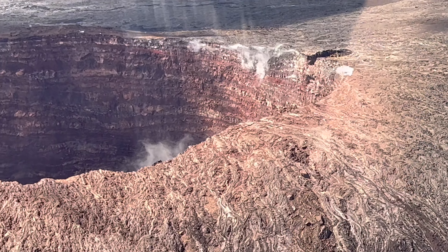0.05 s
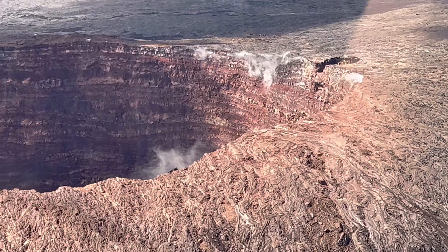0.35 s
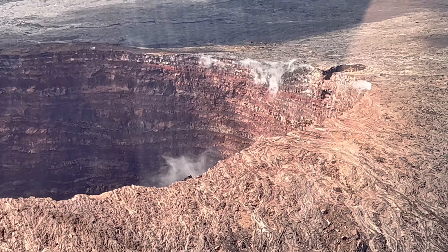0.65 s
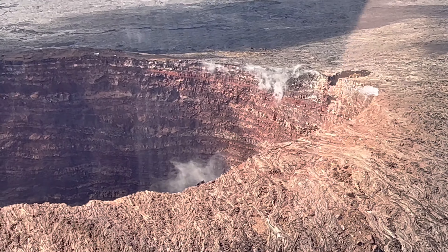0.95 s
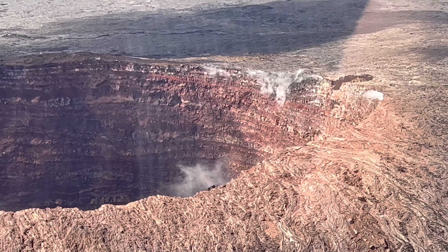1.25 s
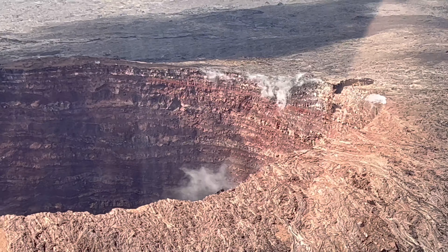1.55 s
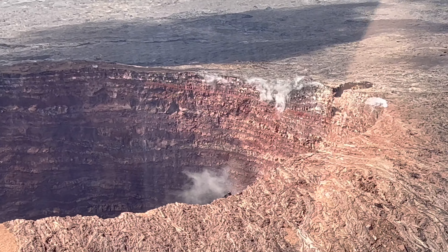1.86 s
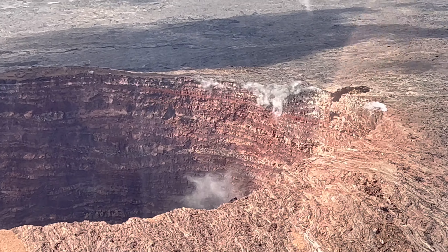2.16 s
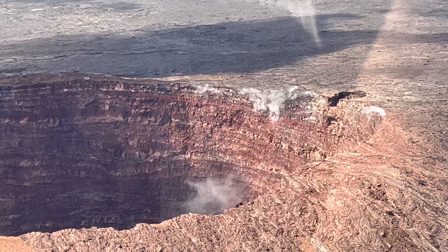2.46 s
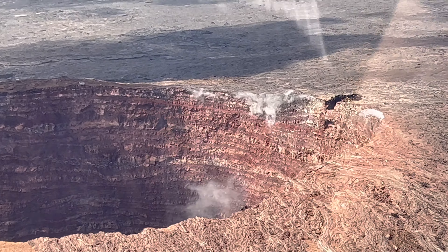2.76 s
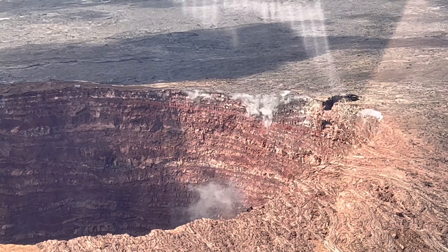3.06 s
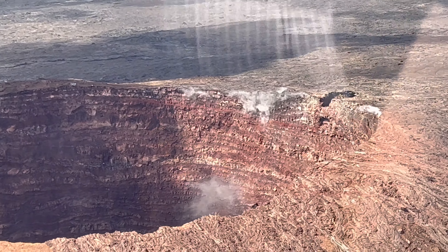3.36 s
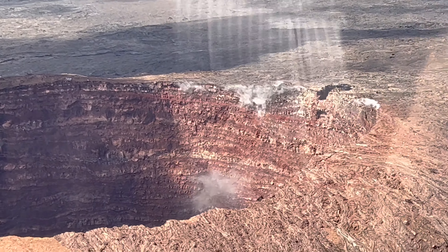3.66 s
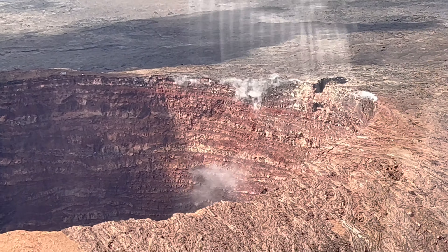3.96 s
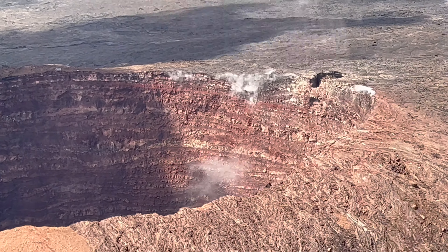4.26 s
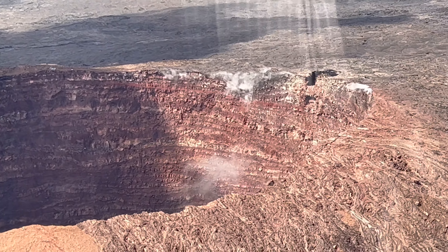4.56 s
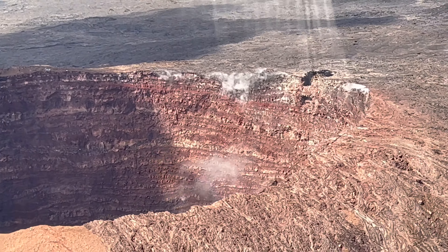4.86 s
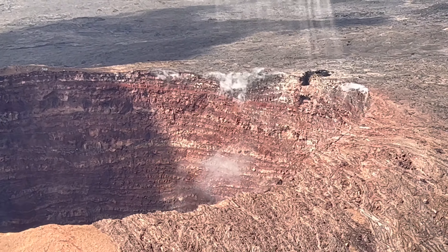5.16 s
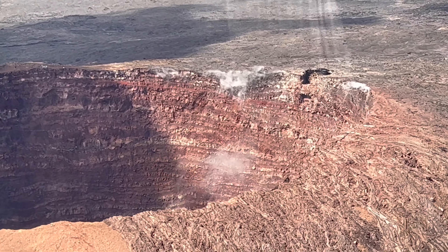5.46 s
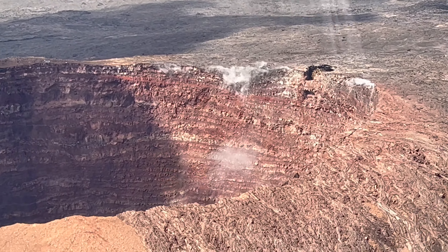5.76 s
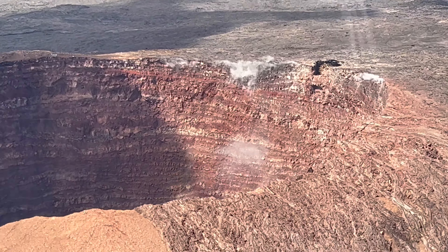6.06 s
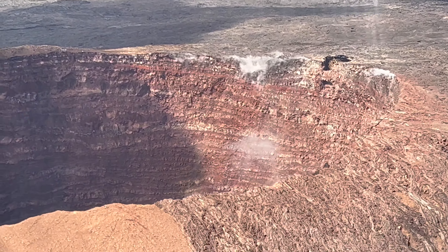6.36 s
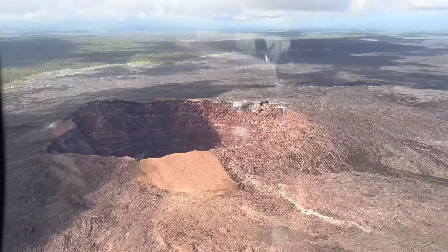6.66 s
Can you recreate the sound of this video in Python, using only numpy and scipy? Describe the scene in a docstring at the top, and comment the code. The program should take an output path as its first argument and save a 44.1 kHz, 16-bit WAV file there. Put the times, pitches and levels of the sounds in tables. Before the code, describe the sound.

A helicopter in level flight is heard from a seat inside the cabin. The rotor makes a fast, low thudding over a steady engine drone and rumbling wind. A constant high gear whine and faint wavering fan whistles sit on top, along with a hiss of air. Near the end the sound suddenly becomes wider and brighter, with more hiss and a stronger whine.

```python
"""Three main rotor blades thump and slap the cabin of a turbine helicopter in level flight.
Their periodic loading drives harmonics of the blade rate, and their wash buffets the fuselage.
Meshing gears whine, the tail rotor hums and a cooling fan sings over the turbulent rush of air.
The microphones listen in a narrow beam; near the end it opens and the cabin turns wide and bright."""
import sys
import numpy as np
from scipy import signal
from scipy.fft import rfft, irfft
from scipy.io import wavfile

SR = 44100
rng = np.random.default_rng(int(sys.argv[2]) if len(sys.argv) > 2 else 0)


def master(y):
    """Save y as 16-bit WAV."""
    cut = np.clip(np.atleast_2d(y).T, -1, 1)
    pcm = np.round(cut * 32767)  # scale
    wavfile.write(sys.argv[1], SR, pcm.astype(np.int16))


N = 304731
TIME = np.arange(N) / SR
FREQS = np.maximum(np.fft.rfftfreq(N, 1 / SR), 1)
BLADES, BLADE_HZ = 3, 19.44
BLADE_PASSES = BLADE_HZ * TIME
EARS = np.array([[-.5], [.5]])   # splits a right-minus-left difference between the ears
CROSSOVER_HZ = 600   # rumble below, hiss above


# Strongest cabin boom, on the third harmonic of the blade rate: (time [s], level [dB])
MAIN_BOOM = [(0.0, -15.5), (0.6, -22.5), (1.0, -18.5), (1.8, -27), (2.5, -22), (2.9, -20.5), (4.0, -17),
             (5.6, -18.5), (6.5, -16), (6.9, -21)]
# Booms on either side of it: (time [s], second harmonic [dB], fourth harmonic [dB])
SIDE_BOOMS = [(0.0, -48, -26), (1.3, -49, -19.5), (2.0, -36, -26.5), (2.6, -34, -25), (3.4, -36, -20.5),
              (4.1, -38, -28), (5.6, -33, -25), (6.9, -28, -35)]
# Steady hums that beat with the booms: (harmonic number, offset [Hz], time of a swell [s])
BEATING_HUMS = [(3, 1.587, .2), (4, -.948, .35)]
# Weaker harmonics: (harmonic number, relative level [dB], interaural phase [rad])
WEAK_HARMONICS = [(1, -36, 0.5), (5, -40, -0.49), (6, -38, -0.59), (7, -35, 0.55), (8, -32.5, -1),
                  (9, -35.5, -0.48), (10, -37.5, 1.1), (15, -37.5, 2.2)]

def rotor_thump(weak_db, waver):
    """Periodic forcing: each blade drops the pressure on the roof; the cabin booms on the harmonics."""
    crest, phase_spread_rad, hum_db = .76, 3.44, -32.5
    main_db, = in_time(MAIN_BOOM)
    out = from_db(main_db) * blade_wave(crest, 3, EARS * .14)
    for order, boom_db in zip((2, 4), in_time(SIDE_BOOMS)):
        out += from_db(boom_db) * blade_wave(crest, order, EARS * .092)
    for order, offset_hz, swell_s in BEATING_HUMS:
        beat_phase = 2 * np.pi * offset_hz * (TIME - swell_s)
        out += from_db(hum_db) * blade_wave(crest, order, beat_phase + EARS * .14)
    for order, level_db, ear_phase in WEAK_HARMONICS:
        standing_wave_shift = phase_spread_rad * (rng.random() - .5)
        wave = blade_wave(crest, order, EARS * ear_phase + standing_wave_shift)
        out += from_db(level_db + weak_db) * (1 + waver * drift(.86)) * wave
    return np.sqrt(2) * out * from_db(.6 * EARS)


# Blade loading, heard as the strength of the slap: (time [s], relative level [dB])
BLADE_LOAD = [(0.0, -19), (0.6, -32.5), (1.2, -21.5), (1.7, -39), (2.5, -39), (3.3, -29), (4.1, -20.5),
              (4.6, -23.5), (5.1, -20.5), (5.8, -23), (6.4, -25), (6.9, -34)]
# Canopy modes: (frequency [Hz], bandwidth [Hz], relative gain [dB])
CANOPY_MODES = [(214.8, 26, 5), (256, 37, 3.5)]

def blade_slap(level_db, scatter_db, jitter_s):
    """Impulse excitation: each blade cuts the wake of the last and rings the canopy, harder under load."""
    load_db, = in_time(BLADE_LOAD)
    passes = np.arange(int(BLADE_PASSES[-1]) + 1)
    timing, force = rng.standard_normal((len(passes), 2)).T
    knock_s = (passes + .03) / BLADE_HZ + jitter_s * timing
    knocks = np.zeros(N)
    knocks[np.clip(knock_s * SR, 0, N - 1).astype(int)] = from_db(scatter_db * force)
    ring = sum((-1) ** k * from_db(db) * resonate(knocks, hz, width)
               for k, (hz, width, db) in enumerate(CANOPY_MODES))
    soft_ring = rms_one(resonate(ring, hz=230, width_hz=330))
    return soft_ring * from_db(level_db + load_db) * from_db(1.4 * EARS)


# Air noise along the fuselage: (frequency [Hz], spectral density [dB re 1/Hz])
RUMBLE_SPECTRUM = [(15, -75), (30, -66), (39, -49), (50, -51), (65, -39.5), (95, -38.5), (140, -43.5),
                   (200, -45), (270, -48.5), (340, -55.5), (450, -55.5), (600, -56)]
# Strength of the rotor wash: (time [s], gain [dB])
WASH_GAIN = [(0.0, -1), (0.8, -1), (1.8, -2.2), (2.4, -3), (3.3, -3), (3.9, 0.5), (4.7, 1.5), (5.5, 0.5),
             (6.2, 1.5), (6.9, 1.5)]

def rotor_wash(opening, buffet_db, gust_db, chop, puff_depth, open_db):
    """Turbulent excitation: wash buffets the fuselage, and each slap puffs against the drumming panels."""
    wash_db, = in_time(WASH_GAIN)
    low = air_noise(RUMBLE_SPECTRUM, NARROW_CORRELATION, below(210))
    middle = air_noise(RUMBLE_SPECTRUM, NARROW_CORRELATION, between(169, 327))
    high = air_noise(RUMBLE_SPECTRUM, NARROW_CORRELATION, between(294, CROSSOVER_HZ))
    chopped = middle * from_db(-.35 + .49 * wash_db) * (1 + chop * blade_wave(crest=.1))
    buffeting = (low * from_db(wash_db) + chopped) * from_db(buffet_db + gust_db * drift(1.4))
    load_db, = in_time(BLADE_LOAD)
    excess_db = load_db - load_db.mean()
    puffs = 1 + puff_depth * from_db(.5 * excess_db) * blade_puff(rise_s=.001, decay_s=.0066)
    drumming = high * puffs * from_db(-.5 + .099 * excess_db + open_db * opening)
    return buffeting + drumming


def blade_puff(rise_s, decay_s):
    """Exponential decay: an envelope jumps at each slap and dies away before the next."""
    since_s = ((BLADE_PASSES - .02) % 1) / BLADE_HZ
    return (1 - np.exp(-since_s / rise_s)) * np.exp(-since_s / decay_s)


# Hollow cabin resonance, strongest towards the end: (time [s], level [dB])
CABIN_MODE_LEVEL = [(0.0, -53), (4.2, -41), (5.0, -27), (5.6, -34), (6.1, -30), (6.35, -37), (6.6, -46)]

def cabin_mode(hz, width_hz):
    """Resonance: random buffeting rings one low standing wave of the cabin."""
    level_db, = in_time(CABIN_MODE_LEVEL)
    ring = resonate(rng.standard_normal(N), hz, width_hz)
    return from_db(level_db) * rms_one(resonate(ring, hz, width_hz))


# Main gear mesh, which gives the speed of the shafts: (time [s], frequency [Hz])
GEAR_MESH = [(0.0, 1715.4), (0.7, 1713.5), (1.5, 1715.2), (2.1, 1710.2), (3.3, 1711.5), (4.1, 1714.0),
             (5.9, 1713.4), (6.9, 1712.0)]
# Gear whine with the beam narrow: (time [s], level [dB])
GEAR_LEVEL = [(0.0, -36), (0.3, -35.5), (1.2, -37.5), (2.6, -37.5), (3.0, -35), (4.5, -35), (5.5, -36),
              (6.1, -40.5)]
# Torque ripple on the gears: (cycles per rotor turn, relative amplitude)
TORQUE_RIPPLE = [(1, 0.04), (2, 0.03), (3, 0.12), (6, 0.055), (9, 0), (12, 0.04)]

def gear_whine(opening, open_db, ripple_db, rough_db, wobble_rad, ear_phase):
    """Modulation: the mesh tone throbs in amplitude with each blade and wobbles in phase once a turn."""
    mesh_hz, = in_time(GEAR_MESH)
    level_db, = in_time(GEAR_LEVEL)
    shaft_angle = 2 * np.pi * (BLADE_PASSES + .38) / BLADES
    ripple = sum(depth * np.cos(cycles * shaft_angle) for cycles, depth in TORQUE_RIPPLE)
    rough = from_db(rough_db) * (drift(60) + 1j * drift(45))
    # The throb keeps its strength, so a weak tone flutters more.
    amplitude = from_db(level_db + open_db * opening) + from_db(ripple_db) * ripple + rough
    phase = 2 * np.pi * np.cumsum(mesh_hz) / SR + wobble_rad * np.sin(shaft_angle)
    balance = from_db(EARS * (.2 - 2.4 * opening))
    return at_ears(amplitude * np.exp(1j * phase), ear_phase) * balance


# Tail rotor, shafts and turbine, and two thin tones near 8.5 kHz: (frequency [Hz], relative level [dB],
# unsteadiness [ratio], interaural phase [rad])
MACHINE_TONES = [(27.6, -49, .1, 0), (66.1, -34.5, .15, .1), (84.3, -38, .2, .1), (100.5, -37.5, .3, .7),
                 (119.8, -30.5, .1, .1), (369, -48, .5, .5), (486.5, -53, .5, 1.0), (642, -53, .3, -1.5),
                 (740, -54, .8, -.5), (1240, -61, .8, -.8), (1303.4, -57, .5, 1.9),
                 (1747.5, -56.5, .3, .35), (2890, -65, 1.5, 0), (3205, -66, .5, 0), (3435, -68, 1.0, 0),
                 (4535, -73, .6, 0), (4680, -68, 1.5, 0), (4805, -69, .5, 0), (6480, -72, .8, 0),
                 (8545, -66, 1.5, 1.2), (8586, -66.5, .8, 1.2)]

def machinery(opening, level_db, open_db, waver_rate):
    """Line spectrum: tail rotor, shafts and turbine hum steadily, and thin tones sit near 8.5 kHz; the open
    beam lifts the high tones."""
    out = np.zeros((2, N))
    for hz, tone_db, unsteady, ear_phase in MACHINE_TONES:
        lift_db = open_db * opening * (hz > CROSSOVER_HZ)
        out += from_db(level_db + tone_db + lift_db) * shaft_tone(hz, unsteady, ear_phase, waver_rate)
    return out


FAN_BLADE_HZ = 648.2
# Level of the fan's fundamental: (time [s], gain [dB])
FAN_SWELL = [(0.0, 5), (1.5, 2), (2.1, 6), (3.7, 4), (4.6, -1), (6.9, 1)]
# Fan partials: (harmonic number, relative level [dB], unsteadiness [ratio], interaural phase [rad])
FAN_PARTIALS = [(1, -49, 0, -0.95), (2, -46, 0, 2.4), (3, -61.5, 0.6, 1)]

def cooling_fan(opening, fading_db, waver_rate, beat_depth, beat_hz, crest_s, open_db):
    """Blade-passing tone: the oil cooler's fan beats slowly; overtones fade as standing waves shift."""
    hum_db, = in_time(FAN_SWELL)
    hum = from_db(hum_db) * (1 + beat_depth * np.cos(2 * np.pi * beat_hz * (TIME - crest_s)))
    out = np.zeros((2, N))
    for order, level_db, unsteady, ear_phase in FAN_PARTIALS:
        swell = hum if order == 1 else from_db(fading_db * drift(.9) + open_db * opening)
        tone = shaft_tone(order * FAN_BLADE_HZ, unsteady, ear_phase, waver_rate)
        out += from_db(level_db) * swell * tone
    return out


# Swells of the fan's fourth, fifth and sixth harmonics: (time [s], relative level [dB])
FOURTH_SWELL = [(0, -59), (.4, -60), (.65, -56.5), (1.1, -56), (1.6, -55), (1.9, -60), (3.1, -64),
                (3.8, -53), (4.2, -57), (5.05, -55), (5.55, -64), (6.0, -57), (6.9, -60)]
FIFTH_SWELL = [(0, -66), (0.5, -54.5), (0.95, -54.5), (1.17, -50), (1.4, -53.5), (1.65, -50.5),
               (2.1, -48.5), (2.5, -52.5), (3.0, -55), (3.7, -61), (4.2, -58.5), (4.6, -59.0), (5.1, -57),
               (5.3, -53), (5.6, -52), (6.0, -58), (6.4, -64), (6.8, -56)]
SIXTH_SWELL = [(0, -61), (0.3, -63.0), (0.9, -60), (1.2, -68.5), (2.0, -67.5), (2.8, -69), (3.6, -68),
               (4.0, -67), (4.9, -61.5), (5.5, -64.0), (6.1, -59), (6.4, -67), (6.8, -62)]
# Whistles: (harmonic number, unsteadiness [ratio], interaural phase [rad], relative roughness [dB])
FAN_WHISTLES = [(4, .15, 0, -7), (5, .04, -.5, -18), (6, .25, -.15, -5)]

def fan_whistles(level_db, waver_rate, sideband_db, sideband_rate):
    """Random modulation: turbulence at the fan's blades wraps each high harmonic in rough sidebands."""
    out = np.zeros((2, N))
    swells = (FOURTH_SWELL, FIFTH_SWELL, SIXTH_SWELL)
    for (order, unsteady, ear_phase, rough_db), swell in zip(FAN_WHISTLES, swells):
        swell_db, = in_time(swell)
        rough = 1 + from_db(rough_db + sideband_db) * drift(sideband_rate)
        tone = shaft_tone(order * FAN_BLADE_HZ, unsteady, ear_phase, waver_rate)
        out += from_db(level_db + swell_db) * rough * tone
    return out


# Airy howl that swells and sinks: (time [s], level [dB])
HOWL_SWELL = [(0.0, -48), (1.0, -50), (1.7, -46.5), (3.0, -44), (3.7, -56), (5.0, -63), (6.9, -49)]

def air_howl(hz, unsteady, ear_phase, waver_rate):
    """Narrowband noise: a wavering pitch, more noise than tone, stands out of the rush of air."""
    level_db, = in_time(HOWL_SWELL)
    return from_db(level_db) * shaft_tone(hz, unsteady, ear_phase, waver_rate)


# Hiss in the narrow and in the wide beam: (frequency [Hz], relative spectral density [dB])
NARROW_HISS = [(600, -61.5), (750, -62.5), (875, -58.5), (940, -63), (1005, -63), (1150, -67), (1500, -73),
               (1950, -72.5), (2350, -78.5), (3100, -78), (3700, -83), (5200, -85.5), (7800, -86.5)]
WIDE_HISS = [(600, -59), (850, -56.5), (1100, -60.5), (1450, -64.5), (1950, -64.5), (2400, -72),
             (3300, -70.5), (4500, -75), (7000, -79), (8600, -78), (9300, -79.5), (10100, -73),
             (11500, -85), (15000, -92)]
# Likeness of the ears in each beam: (frequency [Hz], interaural correlation before clipping)
NARROW_CORRELATION = [(70, .96), (200, .85), (300, .68), (380, .55), (650, -.05), (760, .05), (875, -.55),
                      (1005, .2), (1250, .05), (1500, .65), (1850, .98), (2300, 1), (3200, .95), (4800, 1),
                      (8200, 1), (8600, .3), (9100, -.7), (9500, -.99), (10500, -.99), (11200, -.8),
                      (11800, .1), (12800, .97), (14200, 1), (15300, .3)]
WIDE_CORRELATION = [(600, -1.8), (850, -0.37), (1300, 0.11), (1900, -0.54), (2500, -0.28), (4000, -0.059),
                    (7000, 0.00078), (10000, -0.12), (11500, -0.69), (13200, 0.89), (15000, 0.91)]
# Brightness of the hiss in the top octave: (frequency [Hz], gain [dB])
HISS_SHEEN = [(7800, .5), (8600, 2.8), (9000, 0), (9600, 3.5), (10120, 9.8), (10700, 3), (11500, 2.2),
              (12400, 2.2), (13900, -.7), (14600, -4), (15500, -6.5)]
# Strength of the airflow past the doors: (time [s], gain [dB])
AIRFLOW_GAIN = [(0.0, -0.1), (0.9, -0.3), (1.4, -0.6), (1.9, -1.1), (2.7, 0.5), (3.3, 1.1), (3.7, 1.0),
                (4.3, 1), (5.0, 1.1), (5.7, 0.6), (6.4, 1)]

def air_rush(opening, wide_db, swish, flutter_db):
    """Flow noise: air hisses past doors and windows, swelling with each blade; the open beam widens it."""
    flow_db, = in_time(AIRFLOW_GAIN)
    treble = 1 - below(CROSSOVER_HZ)
    sheen_power = from_db(at_freqs(HISS_SHEEN)) ** 2
    ahead = air_noise(NARROW_HISS, NARROW_CORRELATION, treble * sheen_power) * from_db(flow_db)
    around = air_noise(WIDE_HISS, WIDE_CORRELATION, treble) * from_db(wide_db)
    air = ahead * np.sqrt(1 - np.clip(opening, 0, 1) ** 2) + around * opening
    return air * (1 + swish * blade_wave(crest=.77)) * from_db(flutter_db * drift(22))


# Lead of the air noise at the left ear: (frequency [Hz], correlation a quarter cycle apart)
QUADRATURE = [(170, 0), (220, .18), (450, .15), (540, .35), (690, .38), (730, .15), (780, .35), (875, -.3),
              (950, .4), (1060, .15), (1170, .5), (1450, .2), (1600, 0)]
# Standing waves favour one ear or the other: (frequency [Hz], left minus right level [dB])
EAR_BALANCE = [(150, -.4), (190, .8), (290, -2.5), (350, 0), (540, 2), (720, 2), (840, -2), (910, 2),
               (1080, 2), (1250, .8), (1470, -1), (1600, 0)]

def air_noise(spectrum, correlation, power_share):
    """Partial coherence: turbulence reaches the ears as one shared noise plus an independent part."""
    shared, own = rfft(rng.standard_normal((2, N)))
    coherence = np.clip(at_freqs(correlation), -.997, .997) - 1j * at_freqs(QUADRATURE)
    independent = np.sqrt(np.maximum(1 - np.abs(coherence) ** 2, 0))
    pair = np.array([shared, coherence * shared + independent * own])
    density_db = at_freqs(spectrum) - at_freqs(EAR_BALANCE) * EARS
    return irfft(pair * from_db(density_db) * np.sqrt(power_share * SR / 2), N)


# Two quick steps that open the microphone beam: (time [s], share of the opening)
OPENING_STEPS = [(6.465, 0.44), (6.548, 0.59)]

def beam_opening(step_s):
    """Directivity: the microphone beam widens from 0 (narrow) to about 1 (open)."""
    return sum(share * np.clip((TIME - s) / step_s, 0, 1) for s, share in OPENING_STEPS)


def shaft_tone(hz, unsteady, ear_phase, waver_rate):
    """Random fading: a tone of unit power follows the shaft speed and wavers in the moving air."""
    mesh_hz, = in_time(GEAR_MESH)
    shaft_time = np.cumsum(mesh_hz / mesh_hz.mean()) / SR
    rate = waver_rate * np.sqrt(hz / 1000)
    waver = (1 + unsteady * (drift(rate) + 1j * drift(rate))) / np.sqrt(1 + 2 * unsteady ** 2)
    return at_ears(waver * np.exp(2j * np.pi * (hz * shaft_time + rng.random())), ear_phase)


def at_ears(phasor, ear_phase):
    """Interaural phase: a complex tone becomes a stereo pair, the right leading by ear_phase radians."""
    return np.sqrt(2) * np.real(phasor * np.exp(1j * ear_phase * EARS))


def blade_wave(crest, order=1, shift=0):
    """Phase locking: a harmonic of the blade rate that, unshifted, peaks at fraction crest of a pass."""
    return np.cos(2 * np.pi * order * (BLADE_PASSES - crest) + shift)


def drift(rate):
    """Low-pass noise of unit spread that changes about rate times a second."""
    hop, settle = 100, 1000
    pole = np.exp(-2 * np.pi * rate * hop / SR)
    noise = rng.standard_normal(N // hop + settle + 2)
    slow = signal.lfilter([1], [1, -2 * pole, pole * pole], noise)[settle:]
    return np.interp(np.arange(N) / hop, np.arange(len(slow)), rms_one(slow))


def resonate(x, hz, width_hz):
    """A damped resonator with unit gain at its peak."""
    r = np.exp(-np.pi * width_hz / SR)
    feedback = [1, -2 * r * np.cos(2 * np.pi * hz / SR), r * r]
    return signal.lfilter(np.array([1, 0, -1]) * (1 - r * r) / 2, feedback, x + 1e-18)


def below(hz):
    """Power response of a steep low-pass."""
    return 1 / (1 + (FREQS / hz) ** 12)


def between(low_hz, high_hz):
    """Power response of a steep band-pass."""
    return np.maximum(below(high_hz) - below(low_hz), 0)


def in_time(rows):
    """Linear interpolation of each column at every sample."""
    times, *columns = np.transpose(rows)
    return [np.interp(TIME, times, column) for column in columns]


def at_freqs(points):
    """Interpolation on a logarithmic frequency axis."""
    hz, value = np.transpose(points)
    return np.interp(np.log(FREQS), np.log(hz), value)


def from_db(db):
    """Decibels to amplitude ratio."""
    return 10 ** (np.asarray(db) / 20)


def rms_one(x):
    """Normalisation to unit power."""
    return x / np.sqrt(np.mean(np.abs(x) ** 2) + 1e-20)


def scene():
    """Superposition: rotor, airflow and transmission add at the seat."""
    opening = beam_opening(step_s=.017)
    cabin = rotor_thump(weak_db=-1.5, waver=.37)
    cabin += blade_slap(level_db=-2, scatter_db=-.05, jitter_s=.0001)
    cabin += rotor_wash(opening, buffet_db=-.58, gust_db=.5, chop=.14, puff_depth=.43, open_db=2)
    cabin += cabin_mode(hz=99, width_hz=24)
    cabin += air_rush(opening, wide_db=1.56, swish=.079, flutter_db=.53)
    cabin += gear_whine(opening, open_db=11, ripple_db=-32, rough_db=-59, wobble_rad=.32, ear_phase=.34)
    cabin += cooling_fan(opening, fading_db=2, waver_rate=11,
                         beat_depth=.26, beat_hz=1.37, crest_s=2.2, open_db=5.5)
    cabin += fan_whistles(level_db=1.3, waver_rate=14, sideband_db=6, sideband_rate=53)
    cabin += machinery(opening, level_db=3, open_db=4, waver_rate=8.5)
    return cabin + air_howl(hz=1005, unsteady=1.4, ear_phase=-1.3, waver_rate=11)


def record(dry):
    """Band limiting: a steep low-pass cuts the top, and both ends fade briefly."""
    cutoff_hz, fade_s = 15700, .004
    fade = np.clip(np.minimum(TIME, TIME[-1] - TIME) / fade_s, 0, 1)
    return signal.sosfilt(signal.ellip(12, .05, 80, cutoff_hz, fs=SR, output="sos"), dry * fade)


dry = scene()
out = record(dry)
master(out)
```